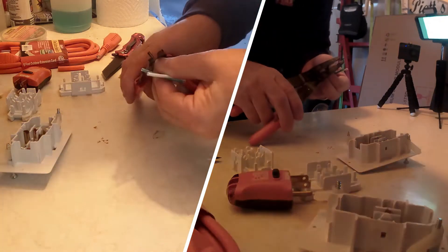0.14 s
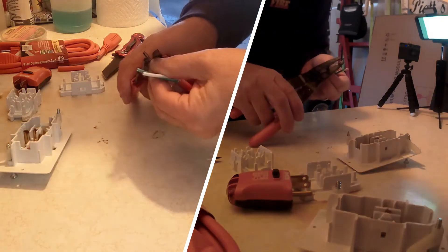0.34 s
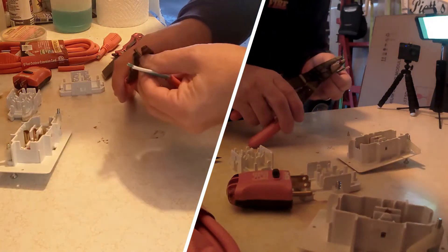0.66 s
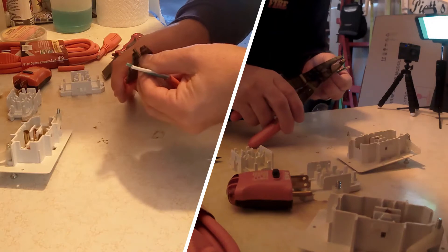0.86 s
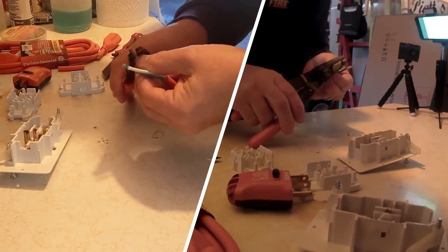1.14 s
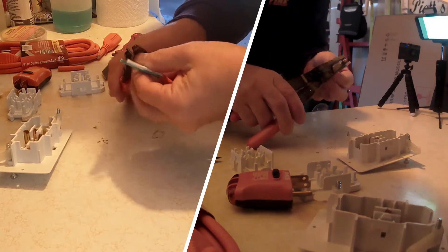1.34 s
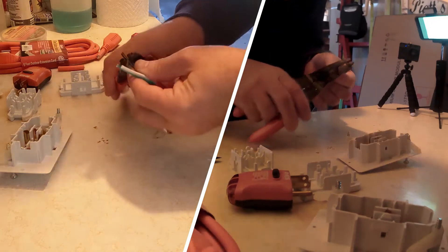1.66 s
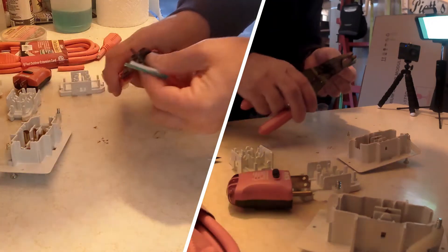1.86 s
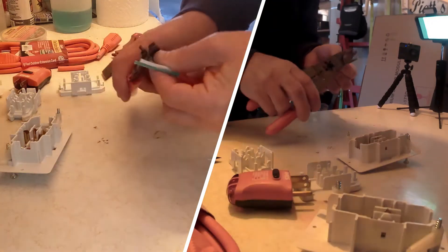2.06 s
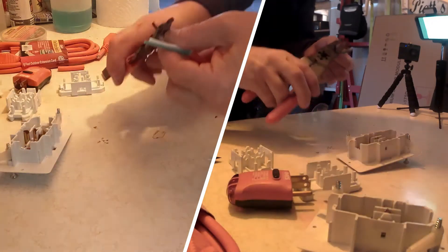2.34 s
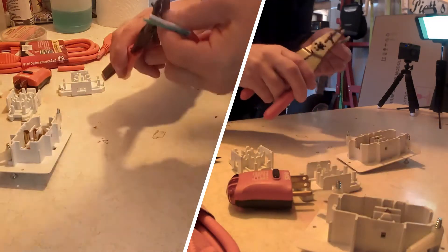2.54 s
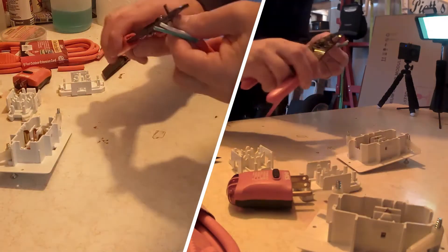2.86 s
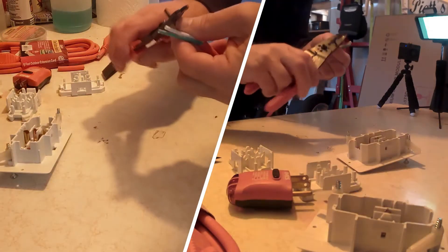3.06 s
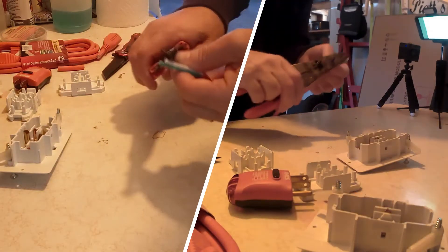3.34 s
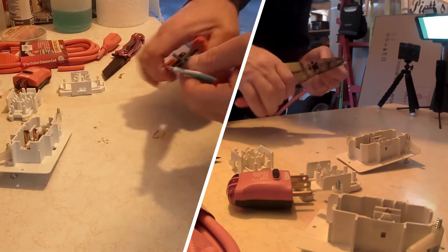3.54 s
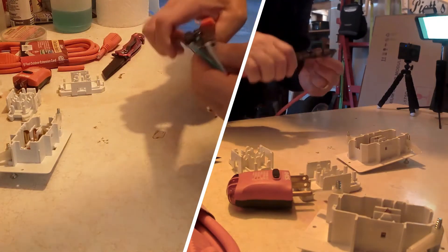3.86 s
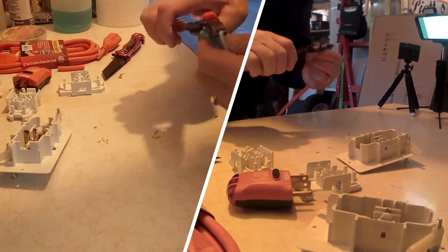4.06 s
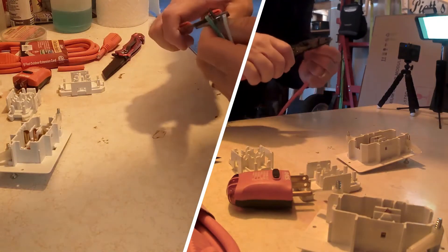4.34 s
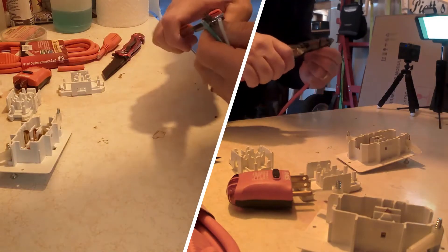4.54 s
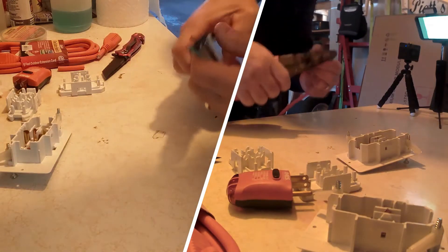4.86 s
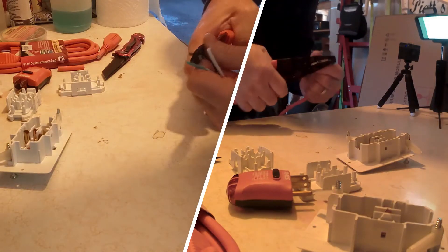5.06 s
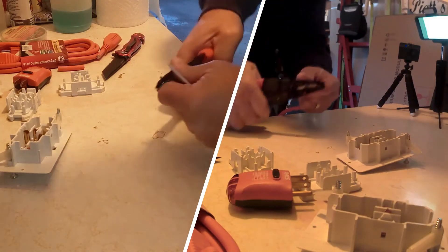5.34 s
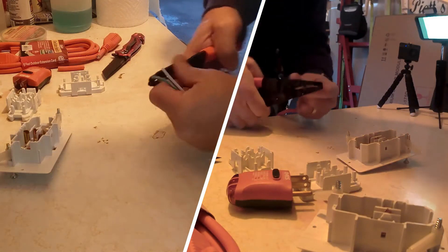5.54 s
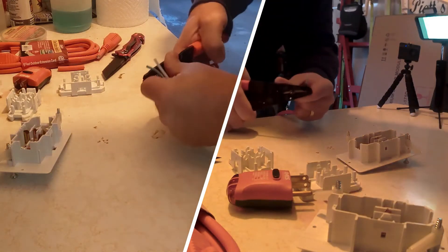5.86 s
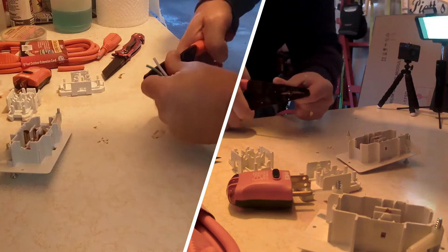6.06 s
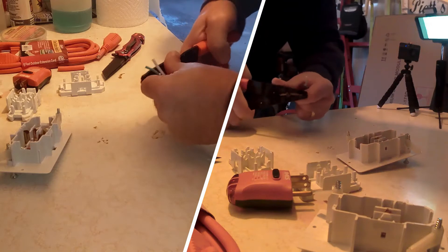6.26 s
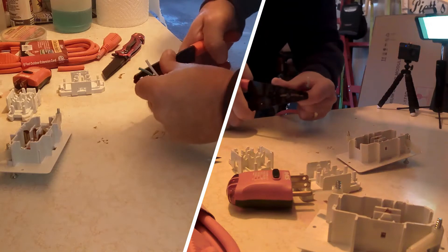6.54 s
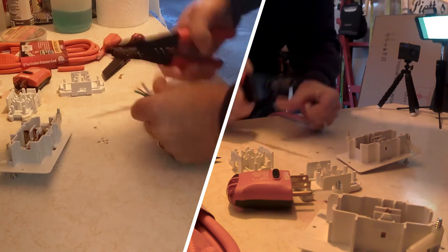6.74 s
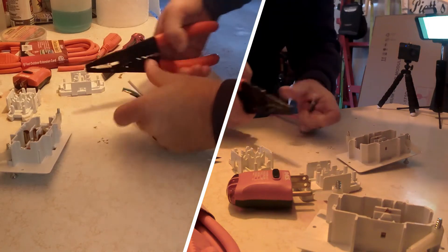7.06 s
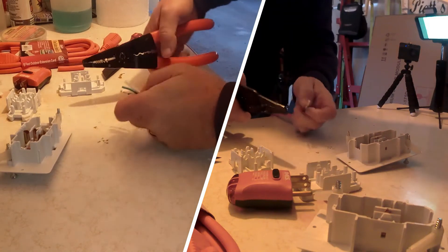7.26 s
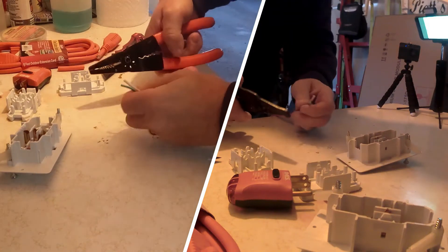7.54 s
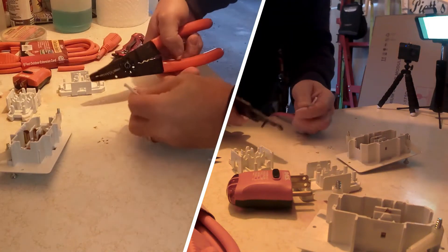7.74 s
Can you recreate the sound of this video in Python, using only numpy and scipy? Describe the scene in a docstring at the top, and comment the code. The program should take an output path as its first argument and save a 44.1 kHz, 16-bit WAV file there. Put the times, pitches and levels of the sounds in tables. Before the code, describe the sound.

Hand wire strippers click and scrape along insulation while forearms bump and slide on a counter, ending in one loud, rattling thump.

```python
"""Hand wire strippers work a cable over a counter, close to a stereo microphone in a small, quiet room.
The steel jaws click, catch and scrape along the insulation, and the tool's spring twangs twice.
Forearms bump, slide and judder on the counter top. When the insulation lets go, an arm thumps the
counter, which sways and rattles loose parts. A motor hums underneath, with a faint electronic whine."""
import sys
import numpy as np
from scipy import signal
from scipy.fft import rfft, irfft
from scipy.io import wavfile
from scipy.ndimage import uniform_filter1d

SR = 44100
rng = np.random.default_rng(int(sys.argv[2]) if len(sys.argv) > 2 else 0)


def bounce(signal):
    """Save signal as a 16-bit WAV file at the path given by the first command-line argument."""
    frames = np.transpose(np.atleast_2d(signal))
    limited = np.clip(frames, -1, 1)
    pcm = np.round(limited * 32767).astype(np.int16)
    wavfile.write(sys.argv[1], SR, pcm)


N = 348654
TIME = np.arange(N) / SR
RING_TIME = TIME[:SR]  # one second for a hit to ring out

# A faint tick at the very start, then clicks of jaws, pivot and cable. Each row: start in seconds,
# level in dB, low and high corner in Hz, T60 in seconds.
CLICKS = [(0.025, -53.5, 280, 3000, 0.033), (1.479, -58.5, 100, 12000, .05),
          (1.837, -55, 4400, 15000, 0.044), (3.2318, -44, 410, 1500, 0.097),
          (4.072, -58, 100, 12000, 0.089), (4.685, -55, 150, 6000, 0.046),
          (4.769, -54.5, 150, 18000, 0.037), (4.847, -56.5, 360, 7000, 0.065),
          (4.867, -54, 1500, 20000, 0.059), (5.668, -46, 3040, 7000, 0.095), (5.727, -51.5, 375, 3000, .18),
          (6.303, -46.5, 340, 1200, .11), (6.3749, -44.5, 100, 3000, 0.026),
          (6.382, -36.5, 230, 7200, .056), (6.4148, -38, 332, 12000, 0.048), (6.878, -55, 100, 10000, .09),
          (6.8846, -41, 320, 6600, 0.067), (6.892, -34, 1300, 1900, 0.067), (7.768, -38, 3930, 4870, 0.023),
          (7.881, -54.5, 7000, 20000, .04)]
# Band edges in Hz for the EQ on each click.
CLICK_EDGES_HZ = [150, 700, 2200, 7000, 15500]
# Insulation catching hard under the blade. Each row: start in seconds, level before trim in dB,
# brightness in dB.
HARD_CATCHES = [(0.657, -48, -28), (1.531, -49, -34), (3.261, -49, -14), (3.6274, -43, -3),
                (3.8666, -43, -27), (4.149, -48, -30), (4.6006, -45, -23), (4.7108, -39.5, -19),
                (4.7328, -38.5, -35), (4.801, -42, -20), (6.8399, -47, -32), (7.2055, -49, -18),
                (7.2433, -48.5, -21)]
# Steady pulls full of light catches. Each row: start and length in seconds, level before trim in dB,
# brightness in dB.
PULLS = [(4.486, .17, -51, -20), (4.666, .17, -47, -17), (5.391, .08, -48, 1)]
# Tone of a catch. Each row: frequency in Hz, gain in dB.
CATCH_EQ = [(500, 0), (1300, 1.5), (1900, -16), (2600, 7), (3200, -11), (4100, 1.5), (4700, -0.5),
            (5700, 3), (7500, -2), (11000, 0), (15500, -11)]
# Insulation drawn through fingers and jaws. Each row: start and length in seconds, level in dB.
SCRAPES = [(1.527, 0.065, -65.5), (1.69, .17, -68), (3.594, 0.28, -61.5), (3.779, 0.1, -58),
           (4.658, 0.18, -69), (5.37, 0.27, -68), (6.43, 0.089, -62), (6.603, 0.039, -61.5)]
# Tone of a scrape. Each row: frequency in Hz, gain in dB.
SCRAPE_EQ = [(1500, -36), (3000, 2), (5500, -2), (7500, -2.5), (11000, 2), (15500, -4)]
# The jaws spring open against their stop. Each row: start in seconds, level in dB.
JAW_STOPS = [(5.667, -50.5), (7.769, -52)]
# The spring is let go. Each row: start in seconds, level before trim in dB.
TWANGS = [(2.329, -49), (7.394, -48.5)]
# Ring of the jaws, the spring and the loose parts. Each row: frequency and width in Hz, gain in dB.
JAW_RESONANCES = [(3090, 92, 1), (3620, 140, 4), (4200, 69, -23), (6100, 79, -1), (6360, 60, -14)]
SPRING_RESONANCES = [(3540, 53, 11), (3800, 86, -5), (4770, 54, -40), (5800, 51, 19), (7490, 84, -1.5),
                     (8000, 100, -18), (8150, 21, -18), (9400, 110, -7), (11300, 260, 1)]
PART_RESONANCES = [(2340, 260, 0), (2660, 200, -4), (3760, 250, -10), (4550, 250, -7), (5050, 250, -1),
                   (11200, 500, -11)]
# Hands and forearms bump the counter. Each row: start in seconds, level in dB, bass offset in dB,
# corner in Hz (higher for a harder contact), ring time as a multiple of the usual.
KNOCKS = [(0.4662, -35.5, -9, 354, 0.64), (1.483, -48, -8, 350, 1.2), (1.6138, -36.5, -11, 360, 0.77),
          (2.098, -51, -20, 1900, 1.9), (2.104, -43.5, -10.5, 970, 1.3), (2.3348, -43.5, -17, 554, 1.6),
          (2.929, -57.5, -2.5, 450, 2.5), (4.418, -46.5, -12.5, 350, 1.96), (5.190, -58, -14, 800, 1.7),
          (5.565, -61.5, 0, 900, 0.8), (6.416, -51.5, 3.5, 650, 1.25), (6.882, -31, -14, 300, 0.9),
          (6.916, -34, -15, 172, 0.6), (6.9405, -27.5, 3.5, 1140, 0.81)]
# Band edges in Hz for the EQ on each knock.
KNOCK_EDGES_HZ = [30, 150, 500, 1200, 3000]
# Modes of the counter top. Each row: frequency in Hz, gain in dB, T60 in seconds before damping.
COUNTER_MODES = [(41.85, 4.5, 1.12), (49, -9.5, 3.4), (54.6, -36, 0.61), (71.1, 10.5, 0.39),
                 (116.5, 4.5, 0.41), (138.5, -2.5, 0.78), (183.8, 2, 0.3), (195, -16.5, 0.77),
                 (231.3, -13.5, 0.45), (286, -8.5, 0.18), (355.7, -4.5, 0.21), (427, -15, 0.46),
                 (513, -10.5, 0.39), (593, 3.5, 0.13), (676, -6, 0.22), (757, -8.5, 0.26), (897, -21, 0.27),
                 (930, -32, 0.13), (1094, -30, 0.14), (1076, -13, 0.14), (1370, -11, 0.16),
                 (1415, -26, 0.18), (1650, -26, .25), (1770, -18, 0.26)]
# Forearms slide on the counter. Each row: start and length in seconds, share spent speeding up,
# level in dB, hiss offset in dB, drone offset in dB.
SLIDES = [(0.535, 0.28, 0.4, -65, 0, -5), (2.62, 0.25, 0.4, -58.5, -6.5, 2),
          (2.878, 0.31, 0.17, -61, -8, 4), (3.14, 0.27, .6, -62, -6.5, 2),
          (3.32, 0.46, 0.36, -52.5, 4, -17.5), (3.6, 0.17, 0.37, -59.5, -25, -4),
          (4.2, 0.21, 0.69, -68, 2, 2), (4.958, 0.23, 0.52, -49, -3, -18),
          (5.78, 0.32, 0.31, -61.5, 0.5, -3), (6.482, 0.19, .5, -70, 4.5, -6),
          (7.53, 0.39, 0.3, -73.5, 3, -15)]
# The counter's ring when rubbed and its low drone under a leaning arm. Each row: frequency and width
# in Hz, gain in dB.
RUB_RESONANCES = [(596, 17, 8), (1120, 11, 6.5), (1434, 16, -22), (1684, 57, -3), (2030, 72, -1),
                  (2350, 56, -9), (3200, 69, -11)]
DRONE_RESONANCES = [(123, 11, -1), (193, 13, 3.5), (349.5, 13.6, -9), (530, 14, -6), (619, 12, -6)]
# Fader curve for skin juddering over the counter. Each row: time in seconds, level in dB.
JUDDER_CURVE = [(5.185, -54.5), (5.26, -52.5), (5.285, -62), (5.315, -52), (5.36, -59), (5.40, -54.5),
                (5.46, -55), (5.50, -68)]
# Tone of a thud, a sleeve's drag and swish, and a judder tap. Each row: frequency in Hz, gain in dB.
THUD_EQ = [(30, -9), (70, -11.5), (150, -3), (280, -6), (480, -4.5), (880, 0), (1300, -13), (1800, -20.5),
           (3000, -37), (7000, -43.5), (15000, -59)]
DRAG_EQ = [(100, -18), (190, -9), (270, -14.5), (350, -5.5), (450, -1.5), (580, 0.5), (720, -5),
           (850, -3.5), (1150, -11), (1800, -36.5), (4000, -68)]
SWISH_EQ = [(500, -16.5), (1100, 7.5), (1700, 5.5), (2300, -3.5), (2800, -11), (3300, -6.5), (4000, -21),
            (5000, -21.5), (8000, -37), (15000, -35)]
JUDDER_EQ = [(120, -21), (200, 5), (270, -13), (330, 4), (430, -4.5), (600, 1), (800, -9.5), (1100, -14.5),
             (2000, -21.5), (5000, -37)]
# Partials of the motor hum. Each row: frequency in Hz, relative level in dB.
HUM_PARTIALS = [(59.2, -0.5), (120, -14), (188.4, -21.5)]
# Whine of the electronics. Each row: frequency in Hz, level in dB.
WHINE_PARTIALS = [(4732, -87.5), (5060, -92.5), (5222, -91), (6363, -91), (6530, -90.5)]
# Colour of the room tone. Each row: frequency in Hz, gain in dB.
ROOM_TONE_EQ = [(20, 26), (40, 23.5), (90, 19.5), (130, 16.5), (170, 9.5), (250, 5), (500, 2), (1100, 0),
                (2000, -4), (5000, -7.5), (7500, -14), (10500, -10), (13000, -12.5), (16000, -16.5)]


def dry_clicks(tail_db=-21, tail_t60=0.29, steepness=3.9):
    """A faint opening tick, then hand-damped steel: dry cracks, scattered by what stands nearby."""
    out, hz = np.zeros((2, N)), centres(CLICK_EDGES_HZ)
    for start, db, low_hz, high_hz, t60 in CLICKS:
        band_db = db + rolloff(low_hz / hz, steepness) + rolloff(hz / high_hz, steepness)
        tail = eq(stereo_noise(SR, split_hz=1300) * decay(tail_t60), [(6000, 4), (13000, -28)])
        crack = impact(t60, direct_db=-7) + amp(tail_db) * tail / np.linalg.norm(tail[0])
        add(out, start, shape_attack(crack, CLICK_EDGES_HZ, band_db, length_s=0.0032))
    return out * pan(db=3)


def blade_catches(trim_db=-14, neutral_brightness_db=-15, rise_s=0.00057):
    """The blade jerks along the insulation in tiny scratches, some dull, some bright."""
    out = np.zeros((2, N))
    for start, db, brightness_db in HARD_CATCHES + light_catches():
        scratch = stereo_noise(SR, split_hz=820) * decay(t60=0.056) * fade_in(rise_s)
        shelf = [(4000, 0), (10000, brightness_db - neutral_brightness_db)]
        tick = eq(eq(scratch, CATCH_EQ), shelf)
        add(out, start, amp(db + trim_db) * unit_attack(tick))
    return out * pan(db=2.5)


def light_catches(per_s=47, jitter=0.18, spread_db=0.5):
    """During a pull the blade catches at a nearly even pace; gives rows like HARD_CATCHES."""
    rows = []
    for start, length_s, db, brightness_db in PULLS:
        at = start
        for gap, size in rng.standard_normal((16, 2)):
            if at < start + length_s:
                rows.append((at, db + spread_db * size, brightness_db))
            at += np.exp(jitter * gap) / per_s
    return rows


def insulation_scrapes(hiss_db=1):
    """Plastic insulation rasps finely and hisses as it is drawn along."""
    pull = sum(amp(db) * swell(start, length_s, peak_share=0.19) for start, length_s, db in SCRAPES)
    rasp = unit(convolve(grains(per_s=1300, spread_db=5), impact(t60=0.025, direct_db=-4)))
    hiss = amp(hiss_db) * stereo_noise(N, split_hz=800)
    return pull * unit(eq(rasp + hiss, SCRAPE_EQ))


def jaw_stops():
    """Let go, the jaws hit their stop and ring for a moment."""
    out = np.zeros((2, N))
    for start, db in JAW_STOPS:
        ring = convolve(impact(t60=0.038, direct_db=-12), ring_out(JAW_RESONANCES))
        add(out, start, amp(db) * unit_attack(ring))
    return out


def spring_twangs(t60=0.41, ring_db=-12, trim_db=-5):
    """The coil spring shivers: its turns chatter against each other and rouse its resonances."""
    out = np.zeros((2, N))
    fizz_eq = [(200, 7), (800, 9), (2000, -5), (4000, 5.5), (8000, 3.5), (11500, -2.5), (15000, -31)]
    for start, db in TWANGS:
        chatter = stereo_noise(SR, split_hz=810) * decay(t60)
        ring = unit_attack(convolve(chatter, ring_out(SPRING_RESONANCES)), length_s=0.012)
        fizz = unit_attack(eq(chatter, fizz_eq))
        add(out, start, amp(db + trim_db) * (fizz + amp(ring_db) * ring))
    return out


def counter_knocks(thud_db=1, thud_t60=0.083, steepness=3.6, max_cycles=190):
    """A short thud of crowded modes; the strong ones ring on unless the hand stays to damp them."""
    out = np.zeros((2, N))
    # The board is lossy, so high modes die sooner.
    damped = [(hz, db, min(t60, max_cycles / hz)) for hz, db, t60 in COUNTER_MODES]
    for start, db, bass_db, corner_hz, ring_scale in KNOCKS:
        band_db = db + np.r_[bass_db, rolloff(centres(KNOCK_EDGES_HZ)[1:] / corner_hz, steepness)]
        blow = impact(thud_t60 * ring_scale, direct_db=-3, split_hz=860, lag_s=0.00052)
        thud = amp(thud_db) * unit_attack(eq(blow, THUD_EQ)) / ring_scale
        body = unit_attack(modes([(hz, mode_db, t60 * ring_scale) for hz, mode_db, t60 in damped]))
        add(out, start, -shape_attack(body + thud, KNOCK_EDGES_HZ, band_db, length_s=0.0156))
    return out * pan(db=2.5)


def counter_shake(sway_db=-35, sway_t60=1.0, buzz_db=-42, buzz_t60=0.73):
    """The heaviest blow leaves the counter swaying on its legs, and everything on it buzzes."""
    out = np.zeros((2, N))
    start = max(KNOCKS, key=lambda knock: knock[1])[0]
    sway_eq = [(18, -25), (30, 11), (42, 0), (55, 2), (75, 9), (130, -12), (220, -15), (500, -55)]
    buzz_eq = [(120, -7), (300, 2.5), (600, -2.5), (900, -2), (1200, -12), (1600, -18),
               (2400, -13), (4000, -33)]
    sway = amp(sway_db) * unit(eq(stereo_noise(SR, split_hz=660), sway_eq)) * decay(sway_t60)
    buzz = amp(buzz_db) * unit(eq(stereo_noise(SR, split_hz=1200), buzz_eq)) * decay(buzz_t60)
    add(out, start, (sway + buzz) * fade_in(rise_s=0.005))
    return out * pan(db=1)


def parts_rattle(start_s=6.9645, swing_s=0.0213, hops=5, first_db=-45, loss_db=1.9, ring_db=-4):
    """Loose plastic and metal parts hop once per swing of the counter, landing softer each time."""
    out = np.zeros((2, N))
    clatter_eq = [(300, -8), (1000, 11.5), (2400, -12), (5000, -10), (7500, -12), (11000, -9.5),
                  (15500, -26)]
    for hop in range(hops):
        touches = impact(t60=0.069, direct_db=-25)
        clatter = unit_attack(eq(touches, clatter_eq))
        ring = unit_attack(convolve(touches, ring_out(PART_RESONANCES)))
        add(out, start_s + hop * swing_s, amp(first_db - hop * loss_db) * (clatter + amp(ring_db) * ring))
    return out * pan(db=3.5)


def sleeve_slides(swish_db=-2, ring_db=-3.5, flutter_db=1.4, snap_db=-5):
    """Sleeve fibres slip and snap on the counter; fast strokes hiss, heavy ones make the board drone."""
    drag_gain, hiss_gain, drone_gain = 0, 0, 0
    for start, length_s, peak_share, db, hiss_db, drone_db in SLIDES:
        stroke = amp(db) * swell(start, length_s, peak_share, sharpness=1.56)
        drag_gain += stroke
        hiss_gain += amp(hiss_db) * stroke
        drone_gain += amp(drone_db) * stroke
    snaps = np.array([grains(per_s=1700, spread_db=5.5), grains(per_s=1500, spread_db=2.5)])
    friction = stereo_noise(N, split_hz=360) + amp(snap_db) * snaps
    friction *= amp(flutter_db * drift(per_s=70))
    drag = unit(eq(friction, DRAG_EQ))
    swish = amp(swish_db) * unit(eq(friction[::-1], SWISH_EQ))  # left and right swapped
    ring = amp(ring_db) * resonate(friction, RUB_RESONANCES)
    drone = resonate(friction, DRONE_RESONANCES)
    return (drag_gain * drag + hiss_gain * (swish + ring) + drone_gain * drone) * pan(db=4)


def hand_judder(per_s=72, jitter=0.35, spread_db=2):
    """The heel of a hand sticks and lets go dozens of times a second, each slip a dull tap."""
    times, levels_db = np.transpose(JUDDER_CURVE)
    out, at = np.zeros((2, N)), times[0] + 0.0055
    for gap, size in rng.standard_normal((30, 2)):
        tap = eq(impact(t60=0.13, direct_db=-8, split_hz=360), JUDDER_EQ)
        add(out, at, amp(spread_db * size) * unit_attack(tap, length_s=1 / per_s))
        at += np.exp(jitter * gap) / per_s
    fader = amp(np.interp(TIME, times, levels_db)) * (TIME > times[0]) * (TIME < times[-1])
    return out * uniform_filter1d(fader, size=600) * pan(db=1.5)


def motor_hum(hum_db=-53.5, waver_rad=0.29, beat_hz=63.1, beat_db=-56, dip_s=1.012, half_length_s=0.6):
    """A motor's wavering hum; a second hum swells and fades, beating against it, deepest at dip_s."""
    t = TIME - dip_s - np.array([[0], [0.00024]])  # the right side hears it a little later
    hum = sum(amp(db) * np.sin(2 * np.pi * hz * t + waver_rad * drift(per_s=9.9))
              for hz, db in HUM_PARTIALS)
    second_hum = np.exp(-(t / half_length_s) ** 4) * unit(np.sin(2 * np.pi * beat_hz * t))
    return (amp(hum_db) * unit(hum) - amp(beat_db) * second_hum) * pan(db=2.5)


def electronics_whine(waver_rad=2):
    """The electronics give off thin, faint tones that waver slightly in pitch."""
    return sum(amp(db) * unit(np.sin(2 * np.pi * hz * TIME + waver_rad * drift(per_s=7.5)))
               for hz, db in WHINE_PARTIALS)


def room_tone(db=-55.5):
    """A soft, even bed of bass-heavy room noise."""
    return amp(db) * unit(eq(stereo_noise(N, split_hz=340), ROOM_TONE_EQ)) * pan(db=0.5)


def room_reverb(x, low_db=-15, low_t60=0.93, high_db=-17, high_t60=0.24, crossover_hz=1800):
    """The room answers with a diffuse tail whose treble dies first."""
    noise = stereo_noise(SR, split_hz=480) * fade_in(rise_s=0.01)
    slow, fast = decay(low_t60), decay(high_t60)
    low = amp(low_db) * butter(noise, crossover_hz, "low") * slow / np.linalg.norm(slow)
    high = amp(high_db) * butter(noise, crossover_hz, "high") * fast / np.linalg.norm(fast)
    return convolve(x, low - high)


def impact(t60, direct_db, split_hz=900, lag_s=0):
    """A sharp pulse, lag_s later on the right, then its scatter off hands, counter and clutter."""
    x = stereo_noise(SR, split_hz) * decay(t60)
    x /= np.sqrt(np.sum(x ** 2) / 2)
    x[[0, 1], [0, int(lag_s * SR)]] += amp(direct_db)
    return x


def modes(rows, spread_db=5.5, lag_s=0.00034, detune=0.006):
    """Ringing (Hz, dB, T60) modes; the higher ones vary most with the spot struck."""
    out = np.zeros((2, SR))
    t = np.maximum(RING_TIME - np.array([[0], [lag_s]]), 0)  # later on the right
    for k, (hz, db, t60) in enumerate(rows):
        weight, shift = rng.standard_normal(2) * min(hz / 600, 1)
        phase = 2 * np.pi * hz * (1 + detune * shift) * t
        out += (-1) ** k * amp(db + spread_db * weight) * decay(t60) * np.sin(phase)
    return out


def ring_out(rows):
    """Struck (Hz, width, dB) resonances: the wider, the shorter."""
    return modes([(hz, db, np.log(1000) / (np.pi * width)) for hz, width, db in rows])


def resonate(x, rows):
    """Steady excitation through (Hz, width, dB) resonances, at RMS 1."""
    return unit(sum(amp(db) * signal.lfilter(*signal.iirpeak(hz, hz / width, fs=SR), x)
                    for hz, width, db in rows))


def grains(per_s, spread_db):
    """Stick-slip: tiny releases of uneven size at random moments."""
    releases = (rng.random(N) < per_s / SR) * rng.choice([-1, 1], N)
    return unit(releases * amp(spread_db * np.minimum(rng.standard_normal(N), 2)))


def stereo_noise(size, split_hz):
    """Noise that is centred below split_hz and wide above."""
    mid, side = rng.standard_normal((2, size))
    side = butter(side, split_hz, "high", order=1)
    return unit(np.array([mid + side, mid - side]))


def drift(per_s):
    """Smooth random modulation at RMS 1."""
    hold = int(SR / per_s)
    steps = np.repeat(rng.standard_normal(N // hold + 1), hold)
    return unit(uniform_filter1d(steps, hold)[:N])


def swell(start_s, length_s, peak_share, sharpness=1):
    """Envelope of one stroke of the hand: it speeds up from rest and slows to rest again."""
    phase = np.interp(TIME, start_s + length_s * np.array([0, peak_share, 1]), [0, np.pi / 2, np.pi])
    return np.sin(phase) ** sharpness * (phase < np.pi)


def decay(t60):
    """One second of envelope, falling 60 dB every t60 seconds."""
    return np.exp(-np.log(1000) * RING_TIME / t60)


def fade_in(rise_s):
    """One second of envelope with a softened onset."""
    return 1 - np.exp(-RING_TIME / rise_s)


def shape_attack(x, edges, band_db, length_s):
    """Each contact has its own softness: EQ the hit so its attack nears these band levels."""
    bands = [butter(x[:, :int(length_s * SR)], band, "band") for band in zip(edges, edges[1:])]
    have_db = 10 * np.log10(np.mean(np.square(bands), axis=(1, 2)))
    return eq(x, np.c_[centres(edges), band_db - have_db])


def eq(x, points, size=4096):
    """Minimum-phase EQ through (Hz, dB) points."""
    hz, db = np.transpose(points)
    bins_hz = np.maximum(np.arange(size // 2 + 1) * SR / size, 1)
    curve_db = np.interp(np.log(bins_hz), np.log(hz), db)
    cepstrum = irfft(np.log(amp(curve_db)))
    cepstrum[1:size // 2] *= 2  # folded forward, so nothing rings ahead of a hit
    cepstrum[size // 2 + 1:] = 0
    return convolve(x, irfft(np.exp(rfft(cepstrum))))


def butter(x, hz, kind, order=2):
    """Gentle low-, high- or band-pass."""
    return signal.sosfilt(signal.butter(order, hz, kind, fs=SR, output="sos"), x)


def convolve(x, response):
    """Convolve, keeping the length."""
    return signal.fftconvolve(np.atleast_2d(x), np.atleast_2d(response), axes=-1)[:, :x.shape[-1]]


def centres(edges):
    """Centres of the bands between the edges."""
    return np.sqrt(np.multiply(edges[:-1], edges[1:]))


def rolloff(ratio, steepness):
    """Gain in dB at a frequency this ratio beyond a corner."""
    return -10 * np.log10(1 + ratio ** steepness)


def amp(db):
    """Decibels to gain."""
    return 10 ** (np.asarray(db) / 20)


def unit(x):
    """Scale to RMS 1."""
    return x / np.sqrt(np.mean(x ** 2))


def unit_attack(x, length_s=0.011):
    """Scale so that the attack has RMS 1."""
    return x / np.sqrt(np.mean(x[:, :int(length_s * SR)] ** 2))


def pan(db):
    """Stereo gains with the left louder by db."""
    return amp(np.array([[db], [-db]]) / 2)


def add(out, start_s, x):
    """Mix x into out from start_s."""
    i = int(start_s * SR)
    out[..., i:i + x.shape[-1]] += x[..., :N - i]


def scene():
    """The handwork and its reverb over a bed of hum, whine and room tone."""
    counter = counter_knocks() + counter_shake() + parts_rattle()
    snaps = dry_clicks() + jaw_stops() + blade_catches() + spring_twangs()
    rubbing = sleeve_slides() + hand_judder() + insulation_scrapes()
    work = snaps + counter + rubbing
    return work + room_reverb(work) + motor_hum() + electronics_whine() + room_tone()


def record(dry):
    """The microphone loses the deepest bass; the recorder cuts the top."""
    low_cut_hz, high_cut_hz = 22, 15800
    high_cut = signal.ellip(10, 0.2, 70, high_cut_hz, fs=SR, output="sos")
    return signal.sosfilt(high_cut, butter(dry, low_cut_hz, "high"))


dry = scene()
out = record(dry)
bounce(out)
```